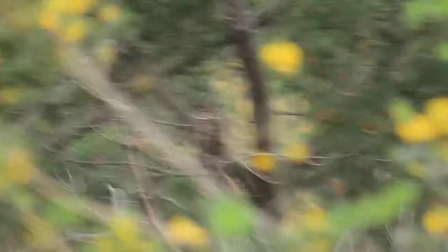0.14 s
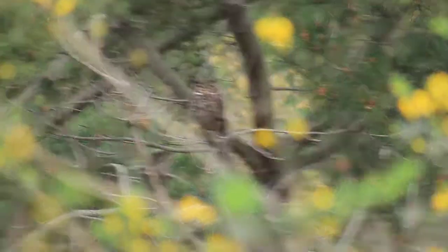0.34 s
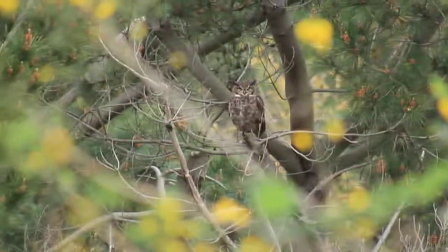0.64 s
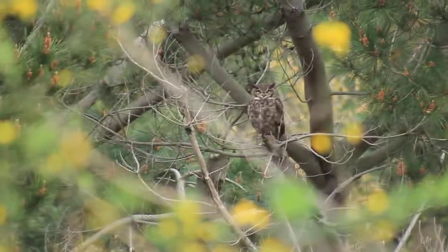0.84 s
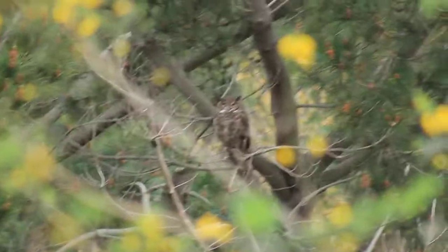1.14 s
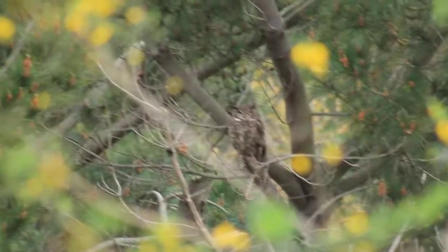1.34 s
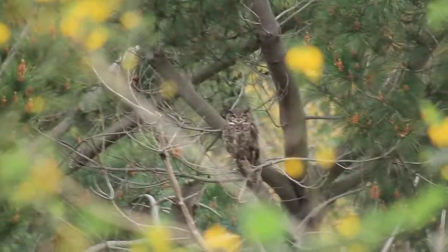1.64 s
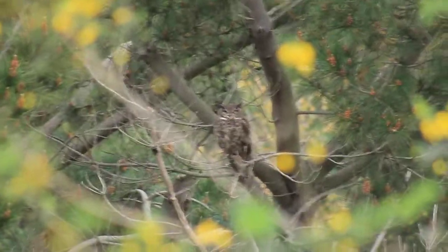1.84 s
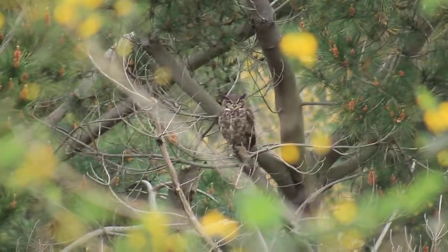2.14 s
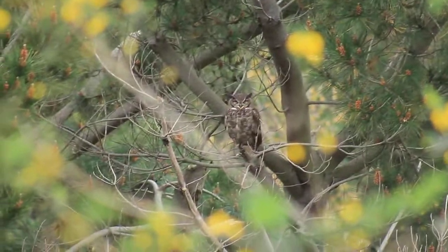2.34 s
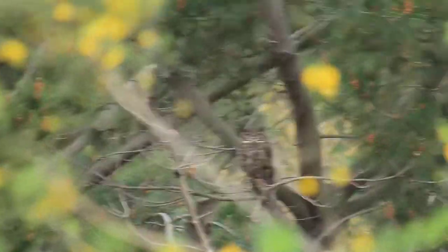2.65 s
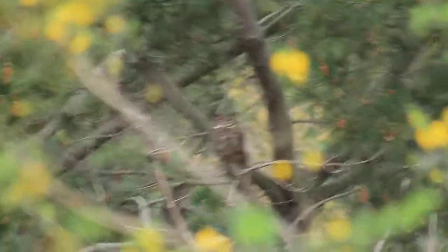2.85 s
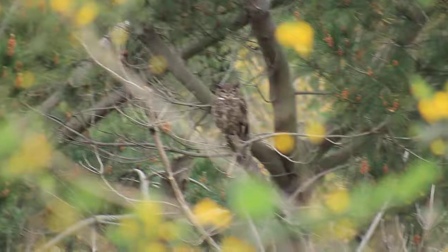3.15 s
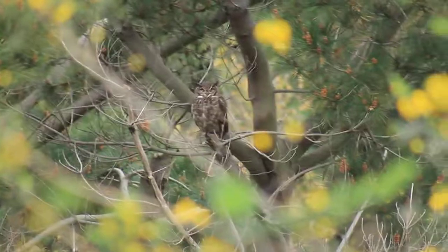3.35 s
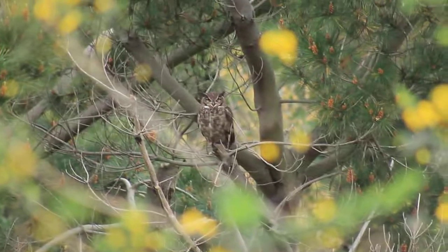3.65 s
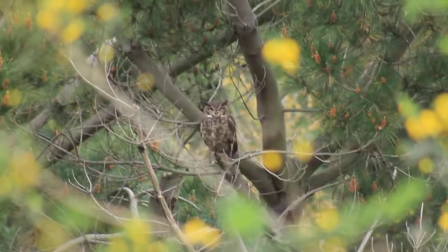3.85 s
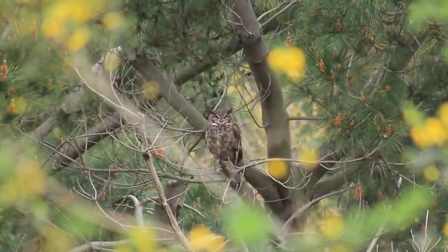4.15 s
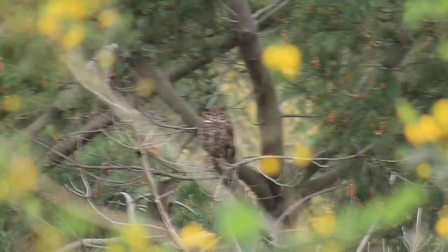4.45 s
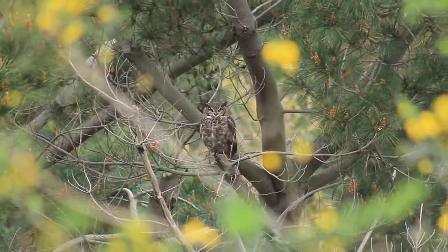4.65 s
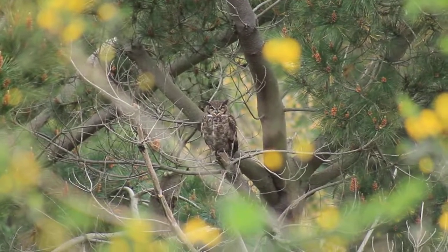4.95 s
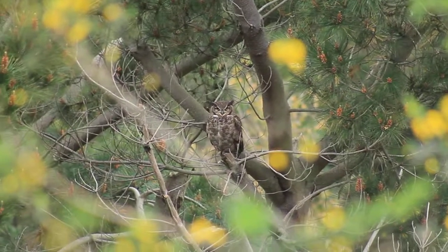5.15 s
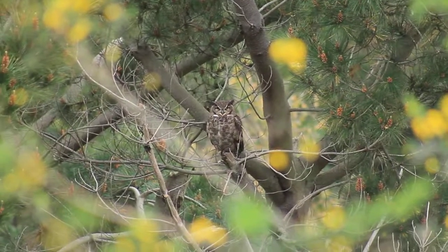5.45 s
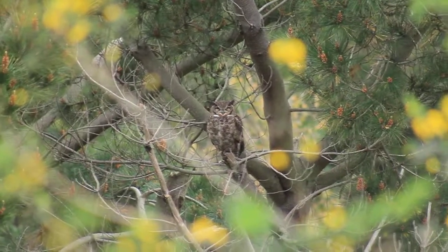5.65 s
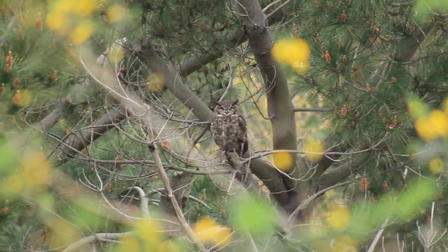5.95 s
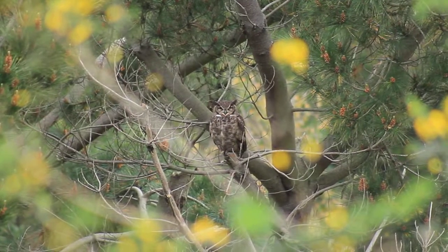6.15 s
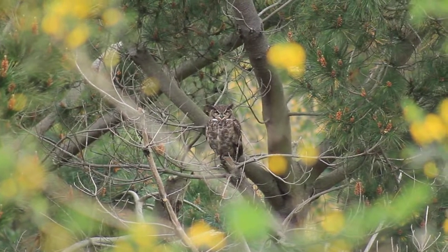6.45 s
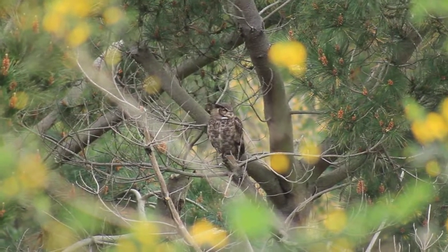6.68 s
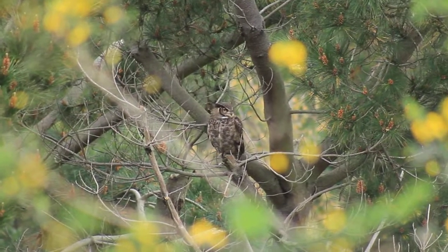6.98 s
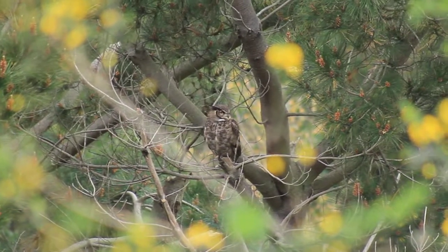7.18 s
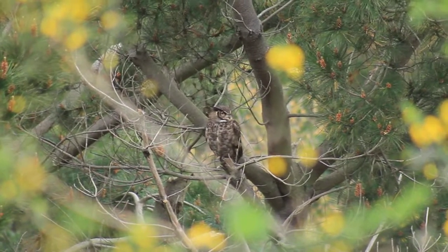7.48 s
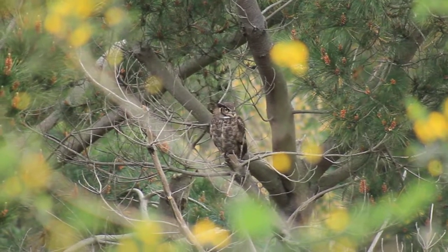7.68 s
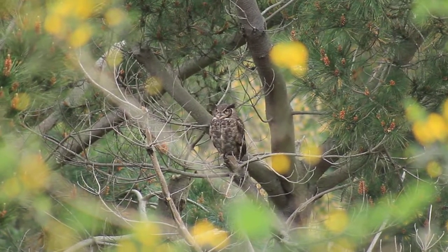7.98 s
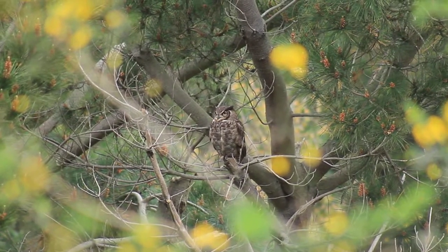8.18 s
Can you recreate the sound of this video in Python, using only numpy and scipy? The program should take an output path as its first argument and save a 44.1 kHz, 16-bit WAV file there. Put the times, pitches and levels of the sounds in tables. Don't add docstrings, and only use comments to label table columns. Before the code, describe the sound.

Quiet wooded slope with faint traffic hum and distant bird caws and chirps, broken by close handling ticks and one loud, slowing ratchety creak.

```python
import sys
import numpy as np
from scipy import signal
from scipy.io import wavfile
from scipy.ndimage import uniform_filter1d

SR = 44100
rng = np.random.default_rng(int(sys.argv[2]) if len(sys.argv) > 2 else 0)


def waveform_to_disk(signal):
    frames = np.transpose(np.atleast_2d(signal))
    scaled = np.clip(frames, -1, 1) * 32767
    samples = np.round(scaled).astype(np.int16)
    wavfile.write(sys.argv[1], SR, samples)


def volts(x):
    e = np.asarray(x, float) / 20
    return 10 ** e


N = 366912


def evened(x):
    return x / np.sqrt(np.mean(x ** 2) + 1e-20)


def add(mix, start_s, sound):
    part = mix[round(start_s * SR):][:len(sound)]
    part += sound[:len(part)]


def band(x, low_hz, high_hz):
    return signal.sosfilt(signal.butter(2, [low_hz, high_hz], "band", fs=SR, output="sos"), x)


def resonate(x, hz, width_hz):
    turn = np.exp(2j * np.pi * np.cumsum(hz * np.ones(len(x))) / SR)
    r = np.exp(-np.pi * width_hz / SR)
    return 2 * (turn * signal.lfilter([1 - r], [1, -r], x / turn)).real


def scatter(t60_s, delay_s):
    t = np.arange(SR // 4) / SR
    taps = rng.standard_normal(len(t)) * volts(-60 * t / t60_s) * (t > delay_s)
    return taps / np.linalg.norm(taps)


# [center_hz, width_hz, level_db]
ENGINES = [(76, 11, -71), (153.18, 8.7, -71)]


def hum():
    noise, t = rng.standard_normal(N), np.arange(N) / SR
    out = np.zeros(N)
    for hz, width_hz, level_db in ENGINES:
        drive = noise + 15 * np.sin(2 * np.pi * hz * t) / width_hz
        out += volts(level_db) * evened(resonate(resonate(drive, hz, width_hz), hz, width_hz))
    return out


# [pitch_hz, density_db]
AIR_SPECTRUM = [(18, -48), (40, -21), (64, -2.5), (128, -2.5), (154, 1), (180, -10.5), (228, -7.5),
                (297, -14), (477, -9.5), (767, -9), (1650, -14.5), (5400, -23), (8500, -27.5),
                (11000, -39.5)]
# [time_s, rise_db]
SWELL = [(0, 4.5), (2.2, 1.7), (3, 4), (5, 0), (6.9, 0.5), (8.32, 0)]
AIR_DB = -58.5


def air():
    frames, hz = N // 256 + 5, np.fft.rfftfreq(1024, 1 / SR)
    real, imag, patches = rng.standard_normal((frames, 513, 3)).T
    patches = evened(uniform_filter1d(uniform_filter1d(patches, size=12, axis=0), size=20, axis=1))
    swell_db = np.interp(np.arange(frames) * 256 / SR, *np.transpose(SWELL))
    reach = np.exp(-(np.log((hz + 1) / 700) / 1.7) ** 2)
    curve_hz, curve_db = np.transpose(AIR_SPECTRUM)
    level_db = np.interp(np.log(hz + 1), np.log(curve_hz), curve_db)
    field_db = level_db[:, None] + reach[:, None] * swell_db + 0.68 * patches
    wash = signal.istft((real + 1j * imag) * volts(field_db), nperseg=1024, noverlap=768)[1][:N]
    return volts(AIR_DB) * evened(wash)


def note(start_s, length_s, start_hz, middle_hz, end_hz, level_db, husk_hz):
    u = np.linspace(-1, 1, round(length_s * SR))
    bend_hz = (start_hz + end_hz) / 2 - middle_hz
    hz = middle_hz + u * (end_hz - start_hz) / 2 + u ** 2 * bend_hz
    if husk_hz:
        breath = rng.standard_normal(len(u))
        tone = resonate(resonate(breath, hz, husk_hz), hz, husk_hz)
    else:
        tone = np.sin(2 * np.pi * np.cumsum(hz) / SR)
    return start_s, volts(level_db) * evened(tone) * signal.windows.tukey(len(u), .4)


# [start_s, length_s, ends_hz, level_db]
PIPES = [(1.44, .045, 2790, -68), (1.515, .044, 3150, -69), (1.766, .088, 3730, -66.5),
         (4.483, 0.087, 3710, -69)]
# [start_s, length_s, pitch_hz, level_db]
THREADS = [(1.77, .06, 2300, -75), (1.869, .07, 3600, -76), (3.422, 0.021, 4240, -67),
           (3.89, .1, 3890, -69.5), (3.98, 0.073, 3865, -68), (4.07, .03, 3870, -73),
           (7.265, .014, 3470, -70), (7.96, .02, 2760, -73)]
# [start_s, length_s, start_hz, end_hz, level_db]
SLIDES = [(.07, .06, 3760, 4200, -75), (.643, .041, 3520, 3340, -67), (1.15, .053, 4240, 3950, -77),
          (1.232, 0.0839, 3930, 3600, -73), (1.403, 0.038, 1770, 1970, -67), (1.507, .035, 3160, 3740, -68),
          (2.085, .031, 4200, 3900, -72.5), (4.409, 0.0362, 3790, 3550, -62.5),
          (4.522, .11, 2370, 2922, -68), (5.885, 0.03104, 4450, 3737, -65),
          (7.901, 0.01917, 3510, 3350, -69.5), (6.74, .04, 1400, 2280, -67.5),
          (7.25, .018, 2800, 3490, -73)]
# [start_s, length_s, start_hz, end_hz, level_db]
DIVES = [
    (2.295, .037, 3050, 2450, -67.5),
    (4.156, 0.039, 3874, 2550, -57.5),
    (4.302, .04, 3850, 2490, -59),
]
PIPE_DIP = .042
DIVE_LAG = 0.215


def whistles():
    rows = [(s, d, hz, hz * (1 - PIPE_DIP), hz, db) for s, d, hz, db in PIPES]
    rows += [(s, d, hz, hz, hz, db) for s, d, hz, db in THREADS]
    rows += [(s, d, a, (a + b) / 2, b, db) for s, d, a, b, db in SLIDES]
    rows += [(s, d, a, (a + b) / 2 + DIVE_LAG * (a - b), b, db) for s, d, a, b, db in DIVES]
    return rows


# [start_s, length_s, middle_hz, level_db]
TWITTER = [(3.712, .03, 5200, -67), (3.775, .035, 5400, -68), (3.8, .02, 4700, -71),
           (3.848, .025, 5400, -66), (3.865, .025, 4740, -69), (3.92, 0.038, 4800, -68),
           (4.36, 0.02788, 3450, -72), (6.755, 0.025, 2760, -68)]
# [start_s, up_s, down_s, level_db]
FLICKS = [
    (4.124, .01, 0.013, -63),
    (4.264, 0.011, 0.019456, -63),
]
# [start_s, length_s, middle_hz, level_db]
PEEPS = [(3.535, .027, 3790, -72), (3.968, .04, 4700, -72), (4.214, 0.03288, 3520, -66),
         (4.465, .02, 3906, -67), (6.73, 0.01953, 7180, -78), (6.88, .06, 5700, -78),
         (6.97, .044, 5330, -75), (7.02, .03, 5220, -75), (7.065, .02, 5360, -75), (7.111, .035, 5180, -73),
         (7.153, 0.03833, 5050, -75), (7.249, .031, 5330, -77), (7.911, 0.10905, 6768, -77)]
CLIMB_PER_S = 9
FLICK_LOW_HZ, FLICK_TOP_HZ, UPSTROKE_DB = 4500, 6600, -5
SINK_HZ = 220


def chirps():
    low, top = FLICK_LOW_HZ, FLICK_TOP_HZ
    rows = []
    for s, d, hz, db in TWITTER:
        climb = CLIMB_PER_S * d / 2
        rows.append((s, d, hz * (1 - climb), hz, hz * (1 + climb), db))
    rows += [(s, up, low, (low + top) / 2, top, db + UPSTROKE_DB) for s, up, down, db in FLICKS]
    rows += [(s + up, down, top, low + 0.3445 * (top - low), low, db) for s, up, down, db in FLICKS]
    rows += [(s, d, hz + SINK_HZ / 2, hz, hz - SINK_HZ / 2, db) for s, d, hz, db in PEEPS]
    return rows


def caw(hz, level_db, throat_hz, width_hz):
    waver = 1 + 0.013353 * evened(uniform_filter1d(rng.standard_normal(len(hz)), size=400))
    turns = np.cumsum(hz * waver) / SR
    k = np.arange(1, 9)[:, None]
    weight = 1 / (1 + ((k * hz - throat_hz) / (0.7278 * width_hz + 60)) ** 4)
    beak = .5 / (1 + ((k * hz - 3450) / 250) ** 4)
    weight = weight + beak * (width_hz > 700)
    voice = (weight * np.sin(2 * np.pi * k * turns)).sum(0) / np.sqrt((weight ** 2).sum(0) / 2)
    return volts(level_db) * voice * signal.windows.tukey(len(hz), .15)


# [start_s, length_s, pitch_hz, level_db, throat_hz]
CAW_HEADS = [
    (0.389, 0.058, 653, -59, 1950),
    (1.573, .036, 691, -58.5, 1850),
    (3.758, 0.048, 707, -62, 2250),
    (4.069, 0.058, 490, -63, 1060),
    (6.9, 0.046, 709, -60.5, 1950),
]
SCOOP, SCOOP_S = 0.093, 0.01739
DROOP, DROOP_S = .05, .01
HEAD_WIDTH = .42


def caw_head(start_s, length_s, hz, level_db, throat_hz):
    t = np.arange(0, length_s, 1 / SR)
    arch = 1 - SCOOP * np.exp(-t / SCOOP_S) - DROOP * np.exp((t - length_s) / DROOP_S)
    return start_s, caw(hz * arch, level_db, throat_hz, HEAD_WIDTH * throat_hz)


# [start_s, length_s, first_hz, last_hz, level_db]
CAW_LINKS = [(.447, .09, 388, 380, -63), (1.557, 0.017, 463, 542, -56.5), (1.606, .016, 470, 410, -61),
             (1.681, .026, 370, 387, -61.5), (3.806, .022, 467, 410, -60), (6.885, .02, 446, 540, -61),
             (6.948, 0.023, 450, 403, -58)]
LINK_THROAT_HZ, LINK_WIDTH_HZ = 1610, 280


def caw_link(start_s, length_s, first_hz, last_hz, level_db):
    hz = np.linspace(first_hz, last_hz, round(length_s * SR))
    return start_s, caw(hz, level_db, LINK_THROAT_HZ, LINK_WIDTH_HZ)


# [start_s, length_s, last_hz, first_db, last_db]
CAW_TAILS = [
    (0.494, .215, 367.6, -60, -62),
    (1.616, 0.065, 386, -55, -60),
    (1.705, 0.13, 374, -61.5, -61),
    (3.819, .215, 350, -58, -68),
    (6.963, .25, 366, -60, -79),
]
TAIL_HZ, BREAK_HZ, SETTLE_S = 410, 40.2, 0.0145
OPEN_HZ, TAIL_WIDTH_HZ, OPEN_WIDTH_HZ = 100, 240, 100


def caw_tail(start_s, length_s, last_hz, first_db, last_db):
    t = np.arange(0, length_s, 1 / SR)
    unsettled = np.exp(-t / SETTLE_S)
    hz = TAIL_HZ + BREAK_HZ * unsettled + (last_hz - TAIL_HZ) * t / length_s
    level_db = first_db + (last_db - first_db) * t / length_s
    throat_hz = 3 * hz + OPEN_HZ * unsettled
    return start_s, caw(hz, level_db, throat_hz, TAIL_WIDTH_HZ + OPEN_WIDTH_HZ * unsettled)


def birds():
    out = np.zeros(N)
    for syllable, rows in [(caw_head, CAW_HEADS), (caw_link, CAW_LINKS), (caw_tail, CAW_TAILS)]:
        for row in rows:
            add(out, *syllable(*row))
    for rows, husk_hz in [(whistles(), 0), (chirps(), 190)]:
        for row in rows:
            add(out, *note(*row, husk_hz=husk_hz))
    return out + volts(-6.5) * signal.fftconvolve(out, scatter(.45, .01))[:N]


def ring(modes, wander=np.zeros(20)):
    t = np.arange(2000) / SR
    out = np.zeros(len(t))
    for (hz, size, t60_s), shift in zip(modes, wander):
        moved_hz = hz * (1 + shift * (hz > 2600))
        out += size * np.sin(2 * np.pi * moved_hz * t) * volts(-60 * t / t60_s)
    return out


QUIET_DB = -18.5


def stroke(start_s, attack_s, hold_s, release_s, level_db):
    corners_s = np.cumsum([0, attack_s, hold_s, release_s])
    t = np.arange(0, corners_s[-1], 1 / SR)
    return start_s, level_db + np.interp(t, corners_s, [QUIET_DB, 0, 0, QUIET_DB])


# [pitch_hz, signed_size, t60_s]
JOINT = [(650, -1.54, .0011), (1334, .06, .042), (1379, 3.5, .0048), (1467, -.69, .0145),
         (1594, -1.9, .0082), (2104, -.33, .0075), (2307, -.39, .0044), (3661, .17, .0086),
         (4052, -1.07, .0031), (4224, 1.53, .0015), (6768, -.11, .006), (7810, .02, .0085),
         (365, .015, .06), (673, .02, .04), (2164, .025, .04), (3420, .012, .03)]
GRIP = [(783, -1.25, 0.0031), (1180, 3.5, 0.0011), (1283, -3.5, 0.0047), (1408, 4, 0.00094),
        (1460, 2.5, 0.0052), (1809, -0.57, 0.01), (3142, -0.83, 0.0033), (3870, 0.01, 0.0076),
        (4856, -3.5, 0.0013), (5150, 1.5, 0.0027), (6430, 0.35, 0.0031), (8160, 0, 0.001)]
# [start_s, attack_s, hold_s, release_s, level_db]
RUBS = [
    (.14, 0.059, .08, 0.081, -44),
    (2.48, 0.17, 0.016, .12, -62),
]
# [start_s, attack_s, hold_s, release_s, level_db]
GRINDS = [
    (.12, 0.041, 0.036, 0.13, -42.5),
    (.2, 0.054, 0.074, .04, -48),
    (.33, .03, 0.13, .05, -61.5),
    (2.33, 0.2, 0.019, .04, -56),
    (2.57, 0.072, 0.038, 0.24, -51.5),
    (2.95, 0.35, .15, .13, -63.5),
]


def friction():
    out = np.zeros(N)
    for strokes, modes, hiss_db in [(RUBS, GRIP, -9), (GRINDS, JOINT, -60)]:
        for row in strokes:
            start_s, level_db = stroke(*row)
            count = len(level_db)
            grains = rng.standard_normal(count) * volts(2.8 * np.minimum(rng.exponential(1, count), 5))
            rung = evened(np.convolve(grains, ring(modes))[:count])
            hiss = band(grains, 3600, 7013.2) + 0.55 * band(grains[::-1], 6000, 9800)
            hiss = hiss + .07 * band(grains, 10000, 15500)
            add(out, start_s, volts(level_db) * (rung + volts(hiss_db) * evened(hiss)))
    return out


# [start_s, level_db, fall_above_lowest_mode_db, ring_time_share_under_hand]
KNOCKS = [
    (2.8215, -21.5, -2, 0.27),
    (4.484, -36.5, 1.5, 0.94),
]
# [pitch_hz, level_db, t60_s]
HOUSING = [(410, -4.5, 0.09), (800, -26, 0.0127), (1155, -0.5, 0.0253), (1400, 1.5, 0.027),
           (1750, 1, 0.024), (2137.8, -2.5, 0.02), (2800, -14, 0.0113)]


def knocks(out):
    t = np.arange(2000) / SR
    build_up = 1 - np.exp(-(t / 0.00069) ** 2)
    for start_s, level_db, dull_db, free in KNOCKS:
        modes = [(hz, -volts(db + dull_db * (hz > 500)), t60_s * free) for hz, db, t60_s in HOUSING]
        add(out, start_s, volts(level_db) * ring(modes) * build_up)


# [start_s, peak_db, extra_grit_db]
CREAK = [(2.6764, -5, 9), (2.6956, -6, 6.5), (2.7098, -6, -2), (2.7264, -7.5, 3), (2.7458, -8.5, 3),
         (2.7732, -9, 3), (2.8001, -9, 3), (2.8296, -9.5, 3), (2.8576, -6.5, -1), (2.88, -6.5, -1),
         (2.9126, -8.5, 3.5), (2.9542, -5.5, -3.5), (2.9745, -5, -4.5), (2.9981, -6.5, -2),
         (3.0542, -6, -5), (3.104, -7, -4), (3.1479, -5, -1.5), (3.179, -6.5, -3), (3.229, -9, 0.5),
         (3.2884, -7.5, 0), (3.3502, -6, -6), (3.607, -4.5, 0.5)]
USUAL_DB = -7
SLIP_MS, QUICKER_MS_PER_DB = .04, 0.0036
THUMP_DB, THINNER_DB_PER_DB = -28.5, 3.0
GRIP_SHARE, LOOSEN_S = .3, 0.1


def creak():
    start_s, peak_db, grit_db = np.transpose(CREAK)
    harder_db = peak_db - USUAL_DB
    slip_ms = SLIP_MS - QUICKER_MS_PER_DB * harder_db
    grip_share = GRIP_SHARE * np.exp(-(start_s - start_s[0]) / LOOSEN_S)
    thump_db = THUMP_DB - THINNER_DB_PER_DB * harder_db
    return list(zip(start_s, peak_db, slip_ms, grip_share, thump_db, grit_db))


def grit_spray(grit):
    out = volts(-21) * band(grit, 10030, 15000) + volts(-5) * band(grit, 7600, 9800)
    for level_db, low_hz, high_hz in [(3.5, 6100, 7300), (12.5, 2700, 3700), (8, 4400, 5700)]:
        out = out + volts(level_db) * band(band(grit, low_hz, high_hz), low_hz, high_hz)
    return out


# [start_s, peak_db, slip_ms, grip_share_0_1, thump_db]
TICKS = [(.13, -27, .071, .31, -16), (.152, -40, .0055, 1, -22), (0.1689, -3.5, 0.0083, 0.82, -29.5),
         (.3496, -22.5, .029, 1, -12.5), (.3639, -34, .05, .49, -24), (0.3702, -23, .022, 0.9, -12),
         (0.4401, -17, .017, 0.65, -14.5), (0.4728, -22, .054, .76, -10), (0.692, -45.5, .05, 0, -21.5),
         (2.102, -47.5, .03, 0.34, -17), (2.2554, -38, .1, .17, -25), (2.594, -39.5, .05, 0.3, -23),
         (2.662, -33, .04, 0.4, -14.5), (3.032, -37.5, .02, 0.44, 0), (3.315, -41, .043, .05, -0.5),
         (3.4087, -38.5, .049, .34, -3), (5.019, -49, .063, 0.3, -12), (5.934, -33, .091, 0.18, -32)]
SNAP_HZ, SNAP_T60_S, SNAP_DB = 9090, .0012, 5.5
DEAD_HZ, DEAD_WIDTH_HZ, DEAD_WANDER = 3950, 290, .05
LEAD = 10


def slips():
    out, t = np.zeros(N), np.arange(2000) / SR
    thump = -np.sin(2 * np.pi * 360 * t) * volts(-60 * t / 0.013)
    thump = thump - .5 * np.sin(2 * np.pi * 190 * t) * volts(-60 * t / 0.016)
    chance = rng.standard_normal((len(TICKS + CREAK), 220))
    push_ms = np.arange(-30, 31) / SR * 1000
    for (start_s, peak_db, slip_ms, share, thump_db, *extra_db), draw in zip(TICKS + creak(), chance):
        push = np.exp(-.5 * (push_ms / max(slip_ms, .003)) ** 2)
        detune = .03 * draw[200] + .012 * draw[200:]
        share = np.clip(share, 0, 1)
        body = share * ring(GRIP, detune) + (1 - share) * ring(JOINT, detune)
        slip = np.convolve(body, push)[30 - LEAD:][:len(t)]
        slip = slip / abs(slip).max() + volts(thump_db) * thump
        grit_db = sum(extra_db) - 11.5 - 400 * slip_ms - 60 * t[:200] / .006
        snap_db = grit_db[0] + SNAP_DB - 280 * slip_ms
        add(slip, LEAD / SR, volts(snap_db) * ring([(SNAP_HZ, 1, SNAP_T60_S)], detune))
        add(slip, LEAD / SR, grit_spray(draw[:200] * volts(grit_db)))
        dead_hz = DEAD_HZ * (1 + DEAD_WANDER * draw[-2])
        slip = signal.lfilter(*signal.iirnotch(dead_hz, DEAD_HZ / DEAD_WIDTH_HZ, SR), slip)
        add(out, start_s - LEAD / SR, volts(peak_db) * slip)
    knocks(out)
    flattened = out - 0.46 * band(out, 1100, 1750)
    return out + volts(-25.0) * signal.fftconvolve(flattened, scatter(0.075, 0.0027))[:N]


SHADOW_HZ, SHADOW_WIDTH_HZ = 7430, 500


def mount():
    shaded = signal.lfilter(*signal.iirnotch(SHADOW_HZ, SHADOW_HZ / SHADOW_WIDTH_HZ, SR), slips())
    return band(shaded + friction(), 110, 15000)


def scene():
    return (air() + hum() + birds() + mount())[None]


def low_pass(x):
    return signal.sosfilt(signal.butter(12, 16520, fs=SR, output="sos"), x)


HISS_DB = -72


def record(dry):
    hissing = dry + volts(HISS_DB) * rng.standard_normal(dry.shape)
    thinned = signal.sosfilt(signal.butter(2, 42, "high", fs=SR, output="sos"), hissing)
    edge = signal.firwin(301, 15880, window=("kaiser", 2), fs=SR)
    return low_pass(signal.oaconvolve(thinned, edge[None], "same"))


dry = scene()
out = record(dry)
waveform_to_disk(out)
```